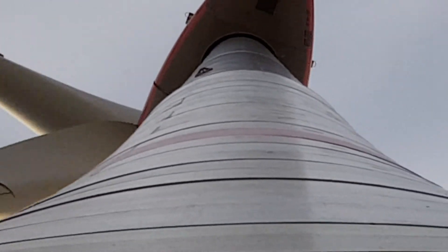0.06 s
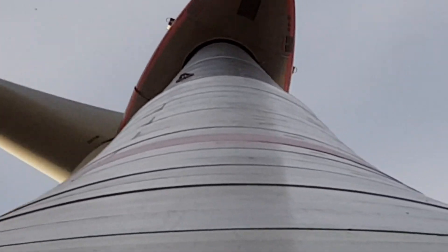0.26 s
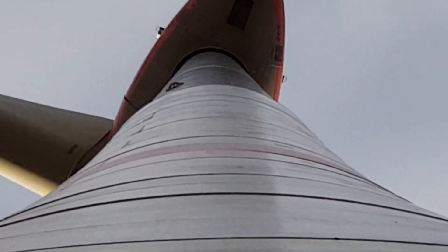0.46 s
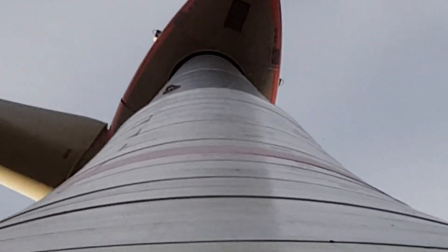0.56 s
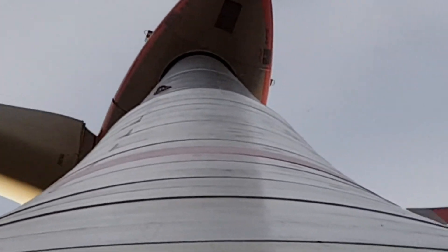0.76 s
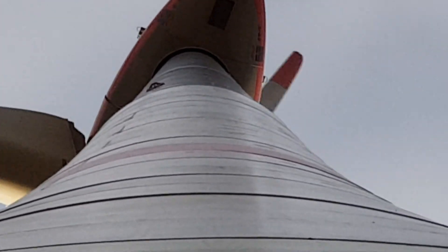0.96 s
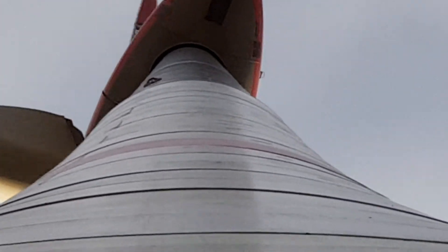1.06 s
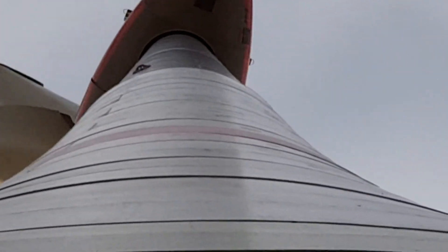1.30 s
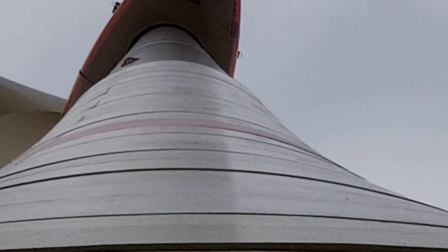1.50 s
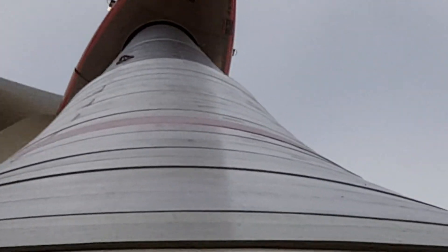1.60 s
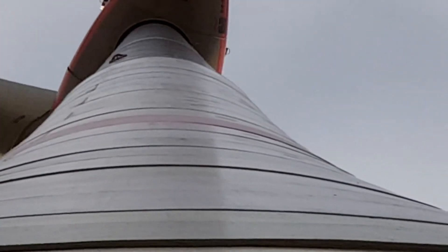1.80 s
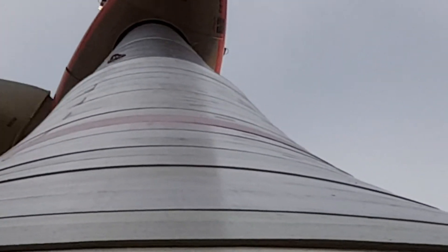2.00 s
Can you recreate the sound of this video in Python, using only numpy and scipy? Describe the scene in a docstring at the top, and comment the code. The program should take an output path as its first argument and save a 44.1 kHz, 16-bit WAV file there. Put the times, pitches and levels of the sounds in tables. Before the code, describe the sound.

Wind turbine blades swish overhead twice above a machinery drone, with wind buffeting the microphone.

```python
"""At the foot of a wind turbine in an open field, in stereo. Machinery drones in the tower throughout.
A few light knocks sound close by as a gust buffets the microphone for the first second. Meanwhile a
blade swishes overhead, the vortices shed from its edge giving a breathy whistle. The gust dies away,
one more knock sounds at about 1.5 s, and a second blade passes more softly, with a higher whistle.
A gear tone swells near the end."""
import sys
import numpy as np
from scipy import signal
from scipy.fft import rfft, irfft
from scipy.io import wavfile

SR = 44100
rng = np.random.default_rng(int(sys.argv[2]) if len(sys.argv) > 2 else 0)


def put_to_file(sound):
    """Save the sound as 16-bit audio at rate SR, in the file named by the first command-line argument."""
    columns = np.atleast_2d(sound).T  # one column per channel
    safe = np.clip(columns, -1, 1)
    whole_steps = np.round(safe * 32767)
    wavfile.write(sys.argv[1], SR, whole_steps.astype(np.int16))


N = 90404

# Rise and fall of each swish overhead: (time [s], level [dB])
FIRST_SWISH_LEVEL = [(0, -44), (.23, -43.5), (.31, -37.5), (.5, -37), (.65, -42), (.9, -47), (1.15, -54),
                     (1.4, -65)]
SECOND_SWISH_LEVEL = [(1.45, -92), (1.63, -52.5), (1.75, -42.5), (1.82, -42), (1.92, -46), (1.98, -43.5),
                      (2.05, -49)]
# Each swish, and the lower rush at the second one's crest: (frequency [Hz], relative level [dB])
FIRST_SWISH_SPECTRUM = [(400, -10), (900, 3), (2100, -3), (2900, 0), (3500, -3), (4100, 1), (5050, -8.5),
                        (5750, -1), (7200, -13.5), (8400, -13), (9800, -20), (10800, -26.5), (15500, -50)]
SECOND_SWISH_SPECTRUM = [(400, -7), (800, -17), (1600, -3.5), (2300, -5), (3050, 2), (3750, -9),
                         (4350, 2.5), (5200, -7), (5900, -5), (7000, -14), (8200, -19), (9600, -16.5),
                         (11500, -23), (13500, -43)]
CREST_SPECTRUM = [(300, -16), (650, 3.5), (1150, -8), (1650, -1), (2200, -21), (5000, -29), (12000, -54)]
# Each blade's edge whistle, and a hiss trailing the first: (time [s], centre [Hz], level [dB])
FIRST_WHISTLE_PATH = [(0, 1400, -66), (.12, 1423, -47.5), (.185, 1450, -48), (.22, 1469, -39.5),
                      (.27, 1415, -43), (.39, 1430, -37.5), (.53, 1558, -42), (.61, 1540, -42),
                      (.69, 1444, -48.5), (1.0, 1408, -61)]
SECOND_WHISTLE_PATH = [(1.55, 2846, -87), (1.68, 2900, -53.5), (1.76, 2996, -45), (1.88, 3084, -47.5),
                       (1.92, 3160, -51), (1.98, 3255, -46.5), (2.05, 3300, -67)]
TRAILING_HISS_PATH = [(.2, 11000, -90), (.45, 11900, -70), (.6, 13600, -68), (.8, 13900, -67),
                      (.92, 14000, -88)]
# Thin falling whistles ahead of the swishes: (peak time [s], level [dB])
FALLING_WHISTLES = [(.15, -59), (1.65, -63.5)]

# Machinery heard from the foot of the tower: (frequency [Hz], relative level [dB])
DRONE_SPECTRUM = [(20, -25), (55, -20), (100, -12.5), (180, -7.5), (280, 0.5), (420, -3), (560, -7),
                  (750, -12.5), (1000, -18), (1600, -28), (3000, -51)]
# Generator hum: (frequency [Hz], average level [dB])
GENERATOR_TONES = [(100.5, -54), (136, -57), (299.5, -53), (360, -53)]
# Gear tone, swelling late: (time [s], average level [dB])
GEAR_LEVEL = [(0, -65), (1.1, -59), (1.75, -58), (1.87, -39.5), (1.98, -41), (2.05, -50)]

# Gust on the microphone: (time [s], level [dB])
GUST_LEVEL = [(0, -36.5), (.1, -37.5), (.17, -33.5), (.22, -28), (.33, -28), (.39, -23.5), (.46, -20),
              (.51, -26), (.58, -19.5), (.73, -27), (.85, -24.5), (.93, -28), (1.02, -33), (1.15, -52)]
# The gust's rumble and its eddies' rasp: (frequency [Hz], relative level [dB])
RUMBLE_SPECTRUM = [(20, -27), (60, 3.5), (110, 4.5), (190, -2.5), (300, -11.5), (500, -23.5), (1000, -45),
                   (2500, -63)]
RASP_SPECTRUM = [(150, -10.5), (300, 3), (480, 1), (750, -11.5), (1000, -33), (2000, -52), (5000, -70)]
# Eddies on the microphone: (middle time [s], half-length [s], level [dB], flutter [Hz], rasp [dB])
EDDIES = [(0.301, 0.012, -20, 109.5, -43), (0.43, .014, -8.5, 165, -20), (0.454, 0.011, -20, 185.9, -34.5),
          (0.547, 0.013, -16, 135, -30), (0.634, 0.013, -16, 187.6, -29),
          (0.788, 0.0096, -16.5, 125.8, -41), (0.812, 0.0084, -18.5, 146, -27),
          (0.886, 0.0072, -27, 151, -37), (0.965, 0.0081, -21, 134.4, -35)]

# Light knocks close by: (time [s], thud drive [dB], ring drive [dB], snap drive [dB])
CLOSE_KNOCKS = [(0.037, -54, -35, -43), (0.153, -34, -19.5, -45), (0.167, -26, -31, -44),
                (.194, -36, -27, -39), (0.224, -27, -25, -34), (0.234, -32, -30, -43),
                (.487, -19, -22, -29.5), (1.475, -31, -46, -41)]
# A knock's dull and bright modes: (frequency [Hz], gain [dB], time to fall 60 dB [s])
THUD_MODES = [(487, -7, 0.027), (680, 1, 0.018), (920, -1, 0.0074)]
RING_MODES = [(1450, -2.5, .032), (1530, -5, 0.013), (2500, -8, 0.0089)]
# Snap of a knock's contact: (frequency [Hz], relative level [dB])
SNAP_SPECTRUM = [(300, -14), (700, -1), (1200, -5), (2600, -5.5), (4000, -18), (7000, -35), (15000, -51)]

# Steady air in the background: (frequency [Hz], relative level [dB])
AIR_SPECTRUM = [(530, -51), (900, -10.5), (1200, -4), (1450, -6), (1610, -2.5), (1840, -4.5), (2050, -7),
                (2220, -7), (3030, -4.5), (3630, -12), (3890, -5.5), (6350, -17.5), (8340, -22.5),
                (9630, -18), (11900, -34), (15500, -55)]
# Side level of the noise against its mid, uneven across the spectrum: (frequency [Hz], side minus mid [dB])
STEREO_WIDTH = [(40, -38), (250, -42.5), (1200, -26), (2800, -34.5), (4200, -18), (8000, -30.5),
                (15000, -23)]


def blades():
    """Two blades sweep through the air overhead; the second swish has a lower rush at its crest."""
    first = envelope(FIRST_SWISH_LEVEL) * turbulence(FIRST_SWISH_SPECTRUM, flicker_db=.7, rate_hz=27)
    second = envelope(SECOND_SWISH_LEVEL) * turbulence(SECOND_SWISH_SPECTRUM, flicker_db=1, rate_hz=29)
    rush = from_db(-38) * turbulence(CREST_SPECTRUM, flicker_db=4.5, rate_hz=9.3)
    return first + second + swell(peak_s=1.81, half_length_s=.047) * rush


def edge_whistles(fall_hz_per_s=5500):
    """Breathy whistles ride on the swishes overhead, and a thin falling one leads each blade in."""
    out = whistle(*in_time(FIRST_WHISTLE_PATH), width_hz=200)
    out += whistle(*in_time(SECOND_WHISTLE_PATH), width_hz=610)
    out += whistle(*in_time(TRAILING_HISS_PATH), width_hz=1400)
    for peak_s, db in FALLING_WHISTLES:
        hz = 7800 - fall_hz_per_s * (np.arange(N) / SR - peak_s)
        out += swell(peak_s, half_length_s=.095) * whistle(hz, db, width_hz=480)
    return out


def whistle(hz, db, width_hz):
    """Vortices shed from an edge: a narrow band of noise around a gliding pitch."""
    lowpass = signal.butter(2, width_hz / 2, fs=SR, output="sos")
    in_phase, quadrature = signal.sosfilt(lowpass, rng.standard_normal((2, N)))
    phase = 2 * np.pi * np.cumsum(hz) / SR
    return from_db(db) * unit_rms(in_phase * np.cos(phase) + quadrature * np.sin(phase))


def machinery(gear_hz=501.6, waver_hz=1.57, waver_db=3.5):
    """The tower drones beside the microphone, with wavering generator and gear tones."""
    tones = 0
    for hz, db in GENERATOR_TONES + [(gear_hz, in_time(GEAR_LEVEL)[0])]:
        gain = from_db(db + waver_db * drift(rate_hz=2))
        tones += gain * tone(hz + waver_hz * drift(rate_hz=7.2))
    return tones + from_db(-38.5) * turbulence(DRONE_SPECTRUM, flicker_db=-1.1, rate_hz=56)


def gust(flutter_spread=.22, skew=.24, rasp_follow_db=3, left_bias_db=1.14):
    """Wind right on the microphone: a lumpy rumble, and eddies that briefly shake the pressure."""
    out = envelope(GUST_LEVEL) * turbulence(RUMBLE_SPECTRUM, flicker_db=1.3, rate_hz=35)
    rasp_noise = turbulence(RASP_SPECTRUM, flicker_db=-.5, rate_hz=78)
    for middle_s, half_length_s, db, flutter_hz, rasp_db in EDDIES:
        swing = tone(flutter_hz * np.exp(flutter_spread * drift(rate_hz=147)))
        pressure = from_db(db) * (swing + skew * (swing ** 2 - 1))
        rasp = from_db(rasp_db + rasp_follow_db * swing) * rasp_noise  # louder on each push
        out += swell(middle_s, half_length_s, steepness=4) * (pressure + rasp)
    return out * from_db(np.array([[1], [-1]]) * left_bias_db / 2)


def knocks(scatter_db=.4, snap_t60_s=.058, snap_top_hz=4000):
    """Close to the microphone, each contact snaps and rings a dull and a bright group of modes."""
    times, thud_db, ring_db, snap_db = np.transpose(CLOSE_KNOCKS)

    def impulses(db):
        """One impulse a knock, its strength slightly scattered."""
        x = np.full(N, 1e-18)
        x[(times * SR).astype(int)] = from_db(db + scatter_db * rng.standard_normal(len(times)))
        return x

    snap_decay = signal.lfilter([1], [1, -from_db(-60 / (snap_t60_s * SR))], impulses(snap_db))
    snap = snap_decay * turbulence(SNAP_SPECTRUM, flicker_db=0, rate_hz=37)
    out = signal.sosfilt(signal.butter(2, snap_top_hz, fs=SR, output="sos"), snap)
    for modes, drive_db in ((THUD_MODES, thud_db), (RING_MODES, ring_db)):
        for k, (hz, mode_db, t60) in enumerate(modes):
            radius, angle = from_db(-60 / (t60 * SR)), 2 * np.pi * hz / SR
            resonator = [0, np.sin(angle)], [1, -2 * radius * np.cos(angle), radius ** 2]
            out += (-1) ** k * signal.lfilter(*resonator, impulses(drive_db + mode_db))
    return out


def air():
    """A steady rush of air lies behind everything."""
    return from_db(-48.5) * turbulence(AIR_SPECTRUM, flicker_db=1.64, rate_hz=22)


def turbulence(spectrum, flicker_db, rate_hz):
    """Coloured stereo noise of rms 1 whose octaves flicker partly together, partly alone."""
    hz = np.arange(N // 2 + 1) * SR / N
    mid, side = rfft(rng.standard_normal((2, N))) * from_db(at_hz(spectrum, hz))
    stereo = mid + side * from_db(at_hz(STEREO_WIDTH, hz)) * np.array([[1], [-1]])
    octave = np.log2(np.clip(hz, 32, 16384))
    together, out = drift(rate_hz), 0
    for k in range(5, 15):
        band = irfft(stereo * np.maximum(1 - abs(octave - k), 0), N)
        out += band * from_db(flicker_db * (together + drift(rate_hz)) / np.sqrt(2))
    return unit_rms(out)


def drift(rate_hz):
    """Random wander of rms 1, mostly slower than the given rate."""
    hz = np.arange(N // 2 + 1) * SR / N
    return unit_rms(irfft(rfft(rng.standard_normal(N)) / (1 + (hz / rate_hz) ** 2), N))


def tone(hz):
    """A sine of rms 1 that follows a pitch."""
    return np.sqrt(2) * np.sin(2 * np.pi * (np.cumsum(hz * np.ones(N)) / SR + rng.random()))


def swell(peak_s, half_length_s, steepness=2):
    """A bell-shaped rise and fall around a moment."""
    return np.exp(-((np.arange(N) / SR - peak_s) / half_length_s) ** steepness)


def envelope(rows):
    """A level curve as gain at every sample."""
    return from_db(in_time(rows)[0])


def in_time(rows):
    """Each column of a curve at every sample."""
    times, *columns = np.transpose(rows)
    return [np.interp(np.arange(N) / SR, times, column) for column in columns]


def at_hz(spectrum, hz):
    """Read a spectrum on a log-frequency axis."""
    points_hz, db = np.transpose(spectrum)
    return np.interp(np.log(hz + 1e-3), np.log(points_hz), db)


def from_db(db):
    """Decibels to gain."""
    return 10 ** (np.asarray(db) / 20)


def unit_rms(x):
    """Scale to unit power."""
    return x / np.sqrt(np.mean(x ** 2) + 1e-20)


def scene():
    """All that reaches the microphone at the foot of the tower."""
    return machinery() + air() + blades() + edge_whistles() + gust() + knocks()


def record(dry, cutoff_hz=15700):
    """The highest treble is cut steeply."""
    return signal.sosfilt(signal.ellip(12, .1, 80, cutoff_hz, fs=SR, output="sos"), dry)


dry = scene()
out = record(dry)
put_to_file(out)
```